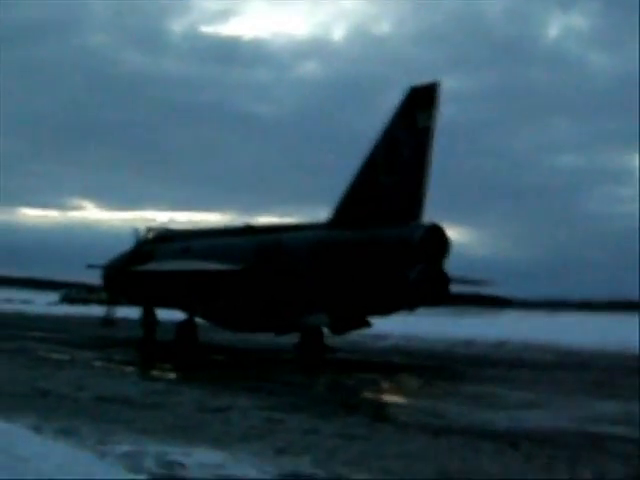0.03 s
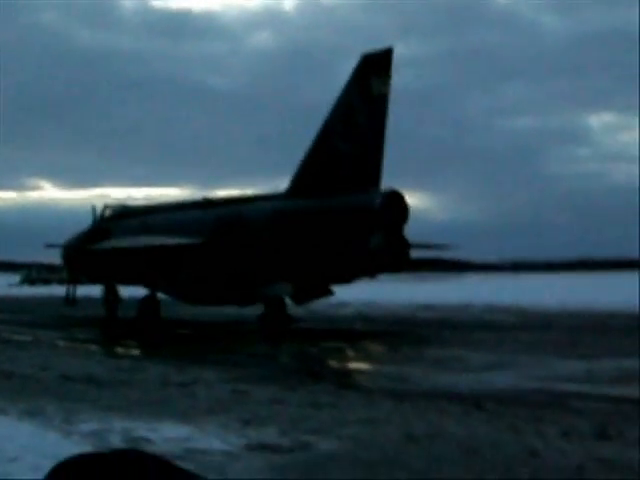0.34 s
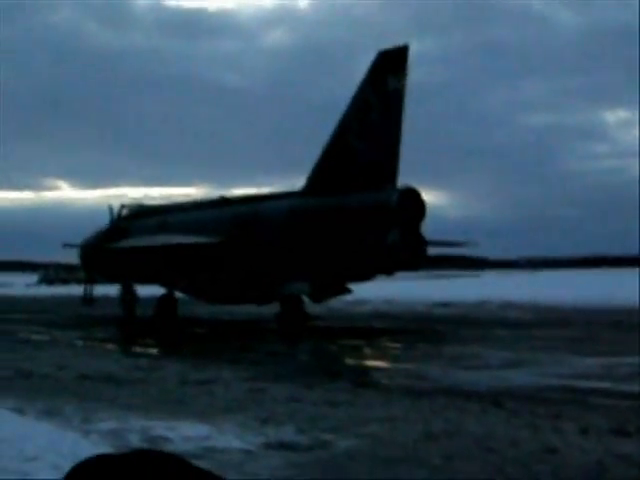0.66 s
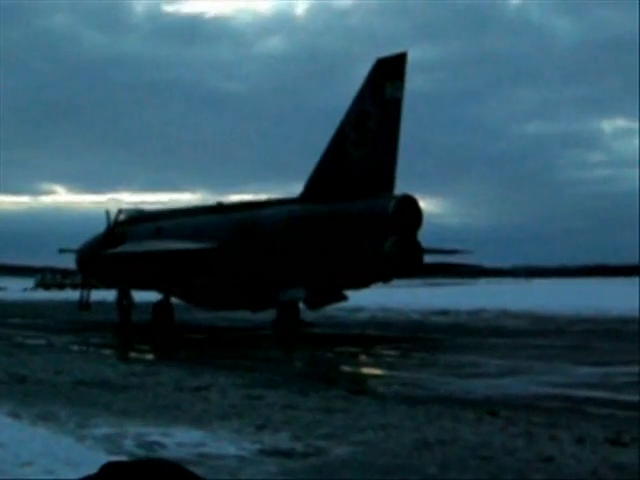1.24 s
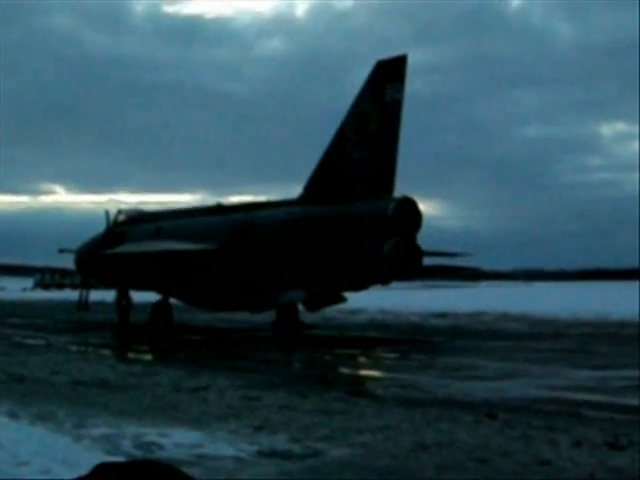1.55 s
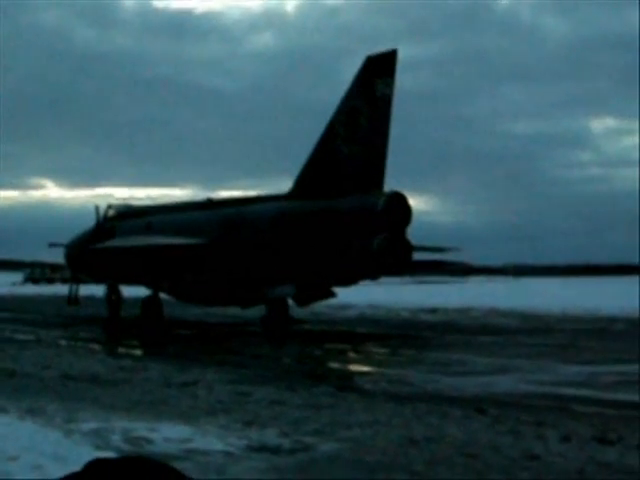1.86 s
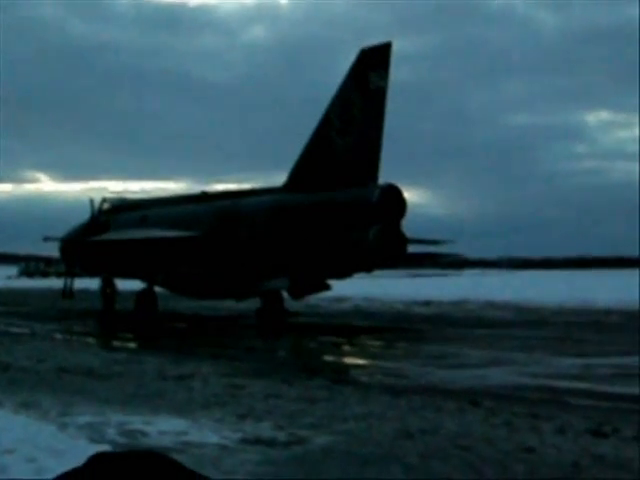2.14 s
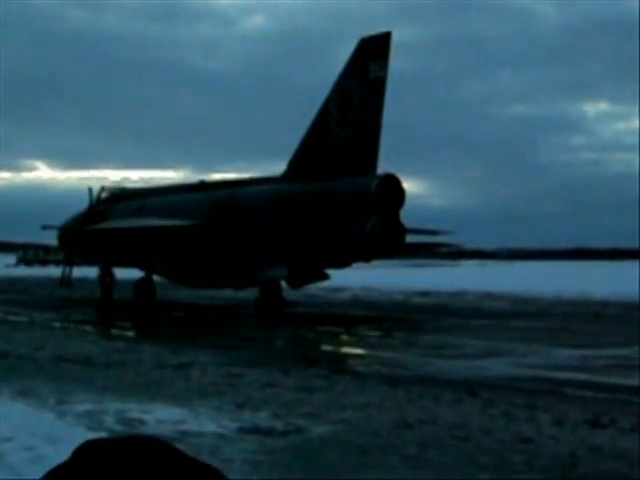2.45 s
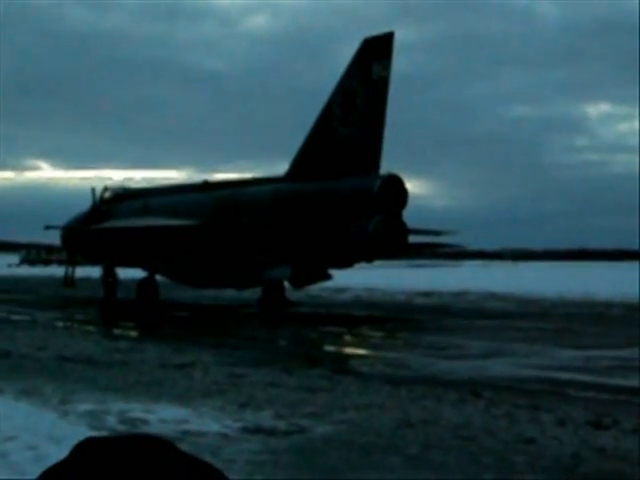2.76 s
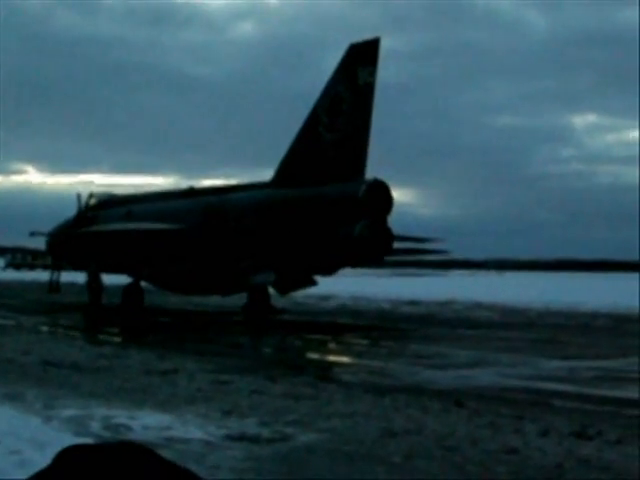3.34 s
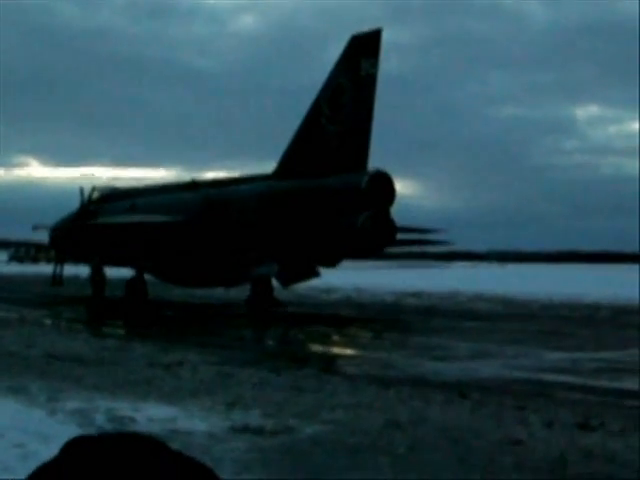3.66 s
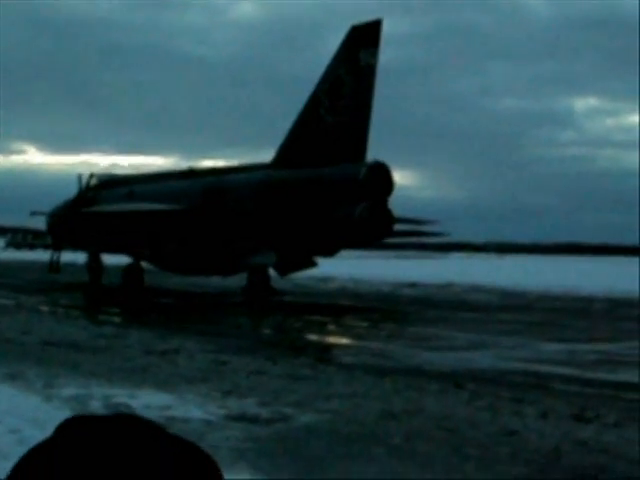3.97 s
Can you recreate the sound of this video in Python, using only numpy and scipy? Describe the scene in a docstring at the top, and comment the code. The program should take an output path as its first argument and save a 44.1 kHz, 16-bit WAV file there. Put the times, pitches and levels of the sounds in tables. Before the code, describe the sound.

A parked fighter jet runs its engines up on an open apron. A low, buffeting roar swells and climbs, then turns into a bright rush and hiss with a hollow howl, increasingly overloading a small microphone.

```python
"""On an open apron, a parked jet fighter runs its engines up, heard from behind.
Large eddies in the exhaust make a low roar that swells and climbs in pitch over a buffeting rumble.
It gives way to the bright, tearing rush and hiss of finer turbulence, with a hollow tailpipe howl
and a faint turbine whine. A small microphone overloads more and more, squaring off the waves."""
import sys
import numpy as np
from scipy import signal
from scipy.fft import rfft, irfft
from scipy.io import wavfile
from scipy.ndimage import uniform_filter1d

SR = 44100
rng = np.random.default_rng(int(sys.argv[2]) if len(sys.argv) > 2 else 0)


def digitize_waveform(pressure):
    """Quantize a signal to 16-bit integers and store it at the path in sys.argv[1].

    Rows of a 2-D input are taken as channels; values are limited to [-1, 1].
    """
    field = np.atleast_2d(pressure).T
    bounded = np.clip(field, -1, 1)
    quanta = np.round(bounded * 32767).astype(np.int16)
    wavfile.write(sys.argv[1], SR, quanta)


N = 176400
TREBLE_HZ, BAND_LIMIT_HZ = 1480, 6150


def amp(db):
    """Amplitude ratio: tenfold for every 20 dB."""
    return 10 ** (np.asarray(db) / 20)


def unit(x):
    """Normalisation to an rms of 1."""
    return x / np.sqrt(np.mean(x ** 2) + 1e-20)


def running_rms(x, samples):
    """Envelope detection: the root of the smoothed power."""
    power = uniform_filter1d(uniform_filter1d(x ** 2, samples), samples // 2)
    return np.sqrt(abs(power) + 1e-12)


def curve(rows, t, column=1):
    """Linear interpolation of one column of a time table."""
    rows = np.array(rows)
    return np.interp(t, rows[:, 0], rows[:, column])


def response(rows, hz):
    """Magnitude response: gain from decibels interpolated over log frequency."""
    f, db = np.transpose(rows)
    return amp(np.interp(np.log(hz + 1), np.log(f + 1), db))


def noise(gain):
    """Spectral shaping: white noise weighted bin by bin, then scaled to rms 1."""
    return unit(irfft(rfft(rng.standard_normal(N)) * gain, N))


def flutter(hz, slow_hz, fast_hz, depth_db):
    """Amplitude modulation by turbulence: a random gain varying mostly between two rates."""
    band = hz / (hz ** 2 + slow_hz ** 2) / np.sqrt(1 + (hz / fast_hz) ** 4)
    return amp(depth_db * noise(band))


def resonances(hz, peaks):
    """Random excitation of resonances: noise confined to narrow bands."""
    return noise(sum(amp(db) / (1 + (2 * (hz - f) / width) ** 4) for f, width, db in peaks))


def turbine_whine(t, hz):
    """Narrow-band noise has pitch: the turbines sound as two faint whines."""
    # whine bands (frequency [Hz], width [Hz], relative level [dB])
    bands = [(2340, 270, -6.5), (3124, 130, -6)]
    # whine envelope (time [s], level [dB])
    envelope = [(0, -48), (.45, -46.5), (.62, -41.5), (1.1, -42), (4, -34.5)]
    return resonances(hz, bands) * amp(curve(envelope, t))


def tailpipe_howl(t, hz):
    """Pipe resonance: turbulence rings the tailpipes, and a lower howl joins at high power."""
    # upper and lower resonances (frequency [Hz], width [Hz], relative level [dB])
    upper_modes = [(852, 110, 0), (971, 150, -2)]
    lower_modes = [(555, 127, 0)]
    # their envelopes (time [s], level [dB])
    upper_envelope = [(0, -29), (.7, -27.5), (1.3, -23.5), (1.799, -18), (2.3, -12), (3.101, -4), (3.6, -8),
                      (4, -11.5)]
    lower_envelope = [(0, -43.5), (1.5, -36.5), (2.5, -20), (3.3, -10.5), (4, -12)]
    upper = resonances(hz, upper_modes) * amp(curve(upper_envelope, t))
    lower = resonances(hz, lower_modes) * amp(curve(lower_envelope, t))
    return upper + lower


def nozzle_hiss(t, hz):
    """Small eddies radiate high frequencies: hiss at the nozzles, with brief flurries at low power."""
    # hiss and flurry spectra (frequency [Hz], relative spectral density [dB])
    hiss_spectrum = [(500, 3), (1200, 1.5), (1900, 6.5), (2400, -1), (3100, -2.5), (3500, -9), (4200, -6),
                     (5000, -5), (6000, -8.5), (8000, -12)]
    flurry_spectrum = [(500, -8.5), (1300, 12.5), (1700, -10), (2400, 7), (3500, -14.5), (4400, -3),
                       (6000, 3), (8000, -5)]
    # hiss envelope (time [s], level [dB])
    envelope = [(0, -39.5), (.7, -45.5), (1.2, -33), (1.8, -30.5), (2.05, -26), (2.25, -17.5), (2.6, -18.5),
                (3.1, -14), (3.5, -6.5), (4, -6)]
    # Gaussian flurries (time [s], length [s], peak level [dB])
    flurries = [(0.11, 0.16, -35), (0.213, 0.047, -47.5), (0.339, 0.1, -30.5), (0.542, .08, -28.5)]
    hiss = noise(response(hiss_spectrum, hz)) * amp(curve(envelope, t))
    swells = sum(amp(db) * np.exp(-2 * ((t - at) / length) ** 2) for at, length, db in flurries)
    hiss += noise(response(flurry_spectrum, hz)) * swells
    return hiss * flutter(hz, slow_hz=14, fast_hz=120, depth_db=.54)


def buffeting_rumble(t, hz):
    """Slow pressure fluctuations: the air behind the aircraft is buffeted into a deep rumble."""
    # rumble spectrum (frequency [Hz], relative spectral density [dB])
    spectrum = [(10, -16.5), (25, -6), (45, 0), (68, -2.5), (95, -5), (160, -19.5), (400, -46.5)]
    # rumble envelope (time [s], level [dB])
    envelope = [(0, -11.5), (1.3, -13), (1.8, -4), (2.2, -2), (2.6, -8), (3.1, -1), (3.4, -10.5),
                (3.7, -15.5), (4, -16)]
    return noise(response(spectrum, hz)) * amp(curve(envelope, t))


def jet_rush(t, hz):
    """Turbulent mixing noise: a mid-range rush whose low part thins at high power."""
    # rush spectrum (frequency [Hz], relative spectral density [dB])
    spectrum = [(100, -14.5), (200, -2.5), (265, 8), (320, 1), (390, -3), (560, -6), (740, -6.5),
                (840, -4.5), (980, -4.5), (1120, -6.5), (1300, -9.5), (1600, -23), (2500, -49)]
    # rush envelope (time [s], level [dB])
    envelope = [(0, -21.5), (.75, -22), (1.3, -16.5), (1.7, -11), (2.2, -5), (2.7, -3), (3.1, -2),
                (3.35, 3), (3.6, -1), (4, 2)]
    # boost or cut of the low part (time [s], gain [dB])
    low_shelf = [(0, 2), (1.5, 3), (2.6, 3), (3.2, 4), (3.6, -9.5), (4, -13)]
    shelf_hz = 417
    rush = noise(response(spectrum, hz))
    low_part = irfft(rfft(rush) / (1 + (hz / shelf_hz) ** 4), N)
    rush += low_part * (amp(curve(low_shelf, t)) - 1)
    return rush * amp(curve(envelope, t)) * flutter(hz, slow_hz=24, fast_hz=70, depth_db=1.22)


def exhaust_roar(t):
    """Large eddies radiate low frequencies: a hump of noise that climbs as the engines spool up."""
    # course of the roar (time [s], level [dB], centre frequency [Hz])
    run_up = [(0, -17, 135), (.6, -15, 129.6), (1.3, -11, 119), (1.5, -5, 115.6), (1.8, -4.5, 114.7),
              (2.2, 1.5, 122.4), (2.6, 3.5, 148.4), (3.05, 4.5, 160.6), (3.3, 1.5, 181),
              (3.55, -16.5, 168.6), (4, -8.5, 155)]
    frame, hop, width_octaves = 4096, 1024, 1.04
    hz = np.fft.rfftfreq(frame, 1 / SR)
    frame_times = np.arange(N // hop + 5) * hop / SR
    centre_hz = curve(run_up, frame_times, column=2)[:, None]
    octaves = np.log2((hz + 1) / centre_hz)
    hump = 1 / (1 + (octaves / width_octaves) ** 2) ** 2 / np.sqrt(centre_hz)
    spectra = hump * np.exp(2j * np.pi * rng.random(hump.shape))
    roar = signal.istft(spectra.T, nperseg=frame, noverlap=frame - hop)[1][:N]
    return unit(roar) * amp(curve(run_up, t))


def scene():
    """Superposition at the microphone; the same gusts modulate the rush, howl and hiss."""
    # gusts, evening out at high power (time [s], rms depth [dB])
    gust_depth = [(0, 1.26), (2, 1.35), (3.1, 1.15), (3.5, 1), (4, 0)]
    t, hz = np.arange(N) / SR, np.fft.rfftfreq(N, 1 / SR)
    gusts = flutter(hz, slow_hz=6, fast_hz=45.5, depth_db=curve(gust_depth, t))
    howl = tailpipe_howl(t, hz)
    whine = turbine_whine(t, hz)
    deep = exhaust_roar(t) + buffeting_rumble(t, hz)
    bright = howl + jet_rush(t, hz) + nozzle_hiss(t, hz)
    return (whine + gusts * bright + deep)[None]


def overload(x):
    """Compression and saturation: a quick gain control runs out of reach, and the waves flatten."""
    aim_db, reach_db, share_removed = -12, 6, .6
    ceiling, skew, knee = .71, .51, 9
    swing_db = 20 * np.log10(running_rms(x, samples=1000)) - aim_db
    x = x * amp(-share_removed * np.clip(swing_db, -reach_db, reach_db))
    x = x + skew * x ** 2 / (1 + (x / ceiling) ** 4)  # asymmetry adds even harmonics
    return x / (1 + abs(x / ceiling) ** knee) ** (1 / knee)


def grit(x, hz):
    """Equal-power mixing: part of the treble blurs into noise that follows its envelope."""
    share = .33
    high_pass = 1 - 1 / (1 + (hz / TREBLE_HZ) ** 6)
    treble = irfft(rfft(x) * high_pass, N)
    blur = noise(high_pass / np.sqrt(hz + TREBLE_HZ) / (1 + (hz / BAND_LIMIT_HZ) ** 20))
    blur *= running_rms(treble, samples=600)
    return x + (np.sqrt(1 - share ** 2) - 1) * treble + share * blur


def sizzle(x, hz):
    """Envelope following: a thin, very high band of noise rises and falls with the treble."""
    centre_hz, width_hz, gain_db = 15370, 140, -42.5
    treble = irfft(rfft(x) * (hz > TREBLE_HZ), N)
    band = np.exp(-((hz - centre_hz) / width_hz) ** 2 / 2)
    return noise(band) * running_rms(treble, samples=600) * amp(gain_db)


def record(dry):
    """Nonlinear distortion: the microphone overloads, and a steep band limit rings and overshoots."""
    # microphone colour after the overload (frequency [Hz], gain [dB])
    colour = [(5, -28), (20, -2.5), (50, -1), (150, 2), (400, -1), (900, 1.33), (2000, 1.5), (4000, 5.5),
              (5000, 1.5), (5700, -3), (6300, -9.5)]
    hz = np.fft.rfftfreq(N, 1 / SR)
    x = grit(overload(dry[0]), hz)
    x = irfft(rfft(x) * response(colour, hz), N)
    x = signal.sosfilt(signal.ellip(9, .2, 80, BAND_LIMIT_HZ, fs=SR, output="sos"), x)
    x = np.clip(x, -1, 1) + sizzle(x, hz)  # overshoots crackle at full scale
    low_pass = signal.firwin(511, cutoff=15800, window=("kaiser", 9), fs=SR)
    return signal.oaconvolve(x, low_pass, "same")[None]


dry = scene()
out = record(dry)
digitize_waveform(out)
```